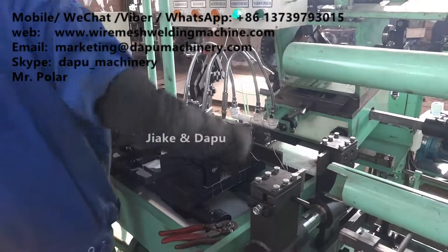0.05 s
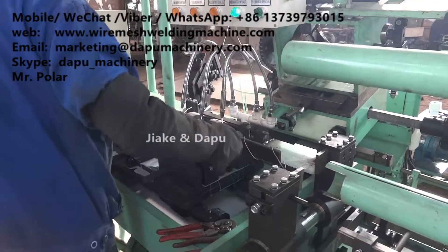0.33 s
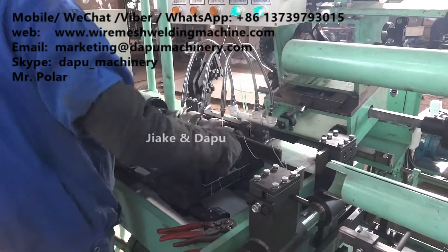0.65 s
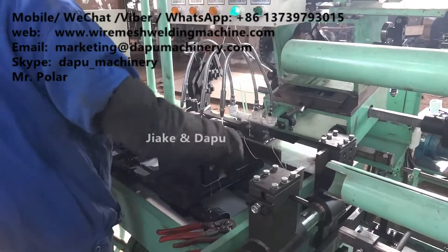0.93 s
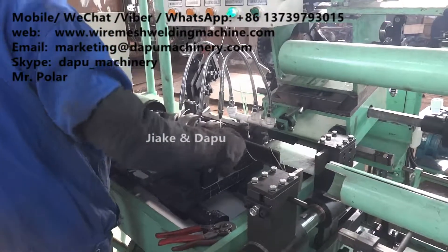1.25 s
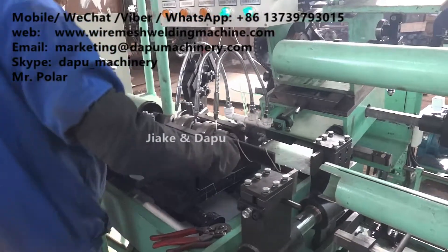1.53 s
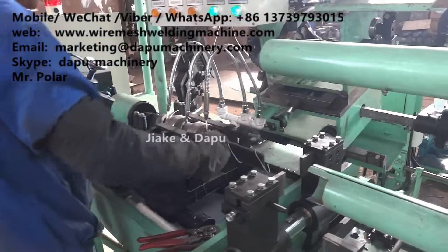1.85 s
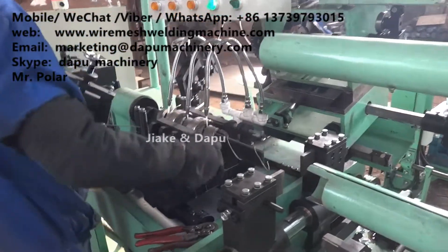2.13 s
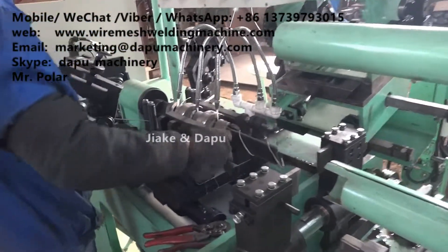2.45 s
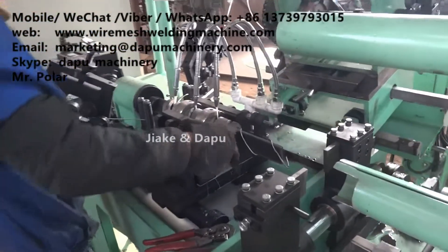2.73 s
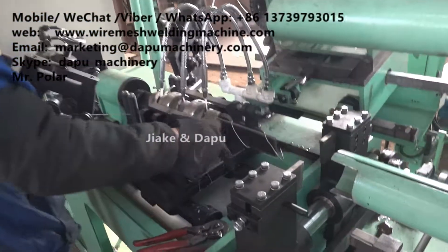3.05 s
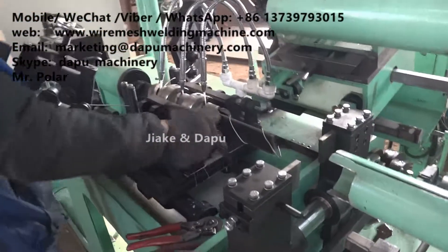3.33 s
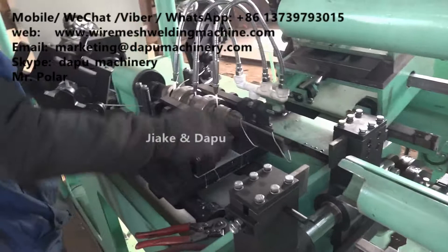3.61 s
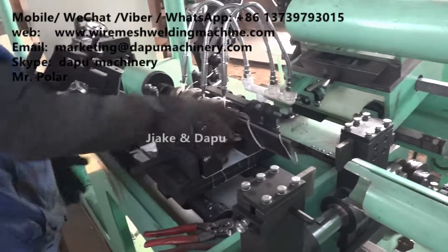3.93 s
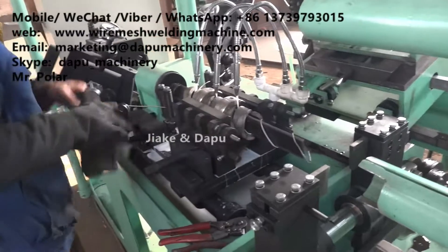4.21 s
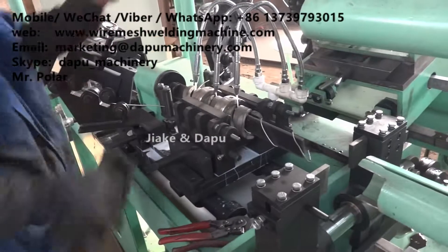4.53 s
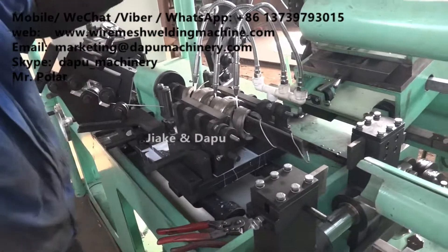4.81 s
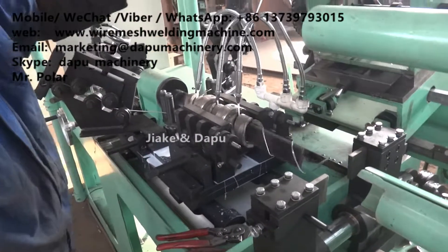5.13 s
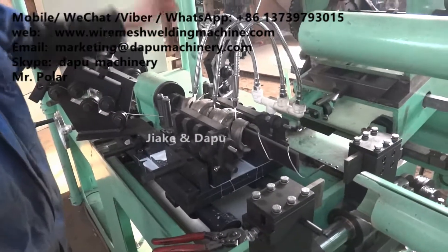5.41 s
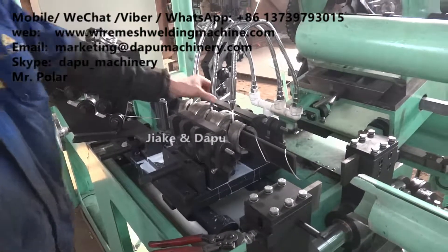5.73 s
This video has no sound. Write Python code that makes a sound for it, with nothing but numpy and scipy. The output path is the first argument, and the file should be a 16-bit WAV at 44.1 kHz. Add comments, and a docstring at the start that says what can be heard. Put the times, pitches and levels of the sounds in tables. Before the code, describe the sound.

A loud, harsh hiss of grinding on steel fills a factory hall, with a fast flutter and shifting ringing squeals. After about four seconds it dies away, and the roar and hum of other machines swell up. Close to the microphone, steel parts click and knock in a quick cluster. Another machine then starts to whine, and a thin distant squeak grows at the end.

```python
"""Grinding steel in a factory hall

An abrasive wheel grinds through steel at about 48 turns a second, then lifts off: its grit hisses,
the steel rings and squeals. Gain control lets the roar and hum of other machines swell up behind it.
Close by, a few steel parts click as a worker handles the wire feed of a fence machine."""
import sys
import numpy as np
from scipy import signal
from scipy.fft import rfft, irfft
from scipy.io import wavfile
from scipy.ndimage import uniform_filter1d, map_coordinates

SR = 44100
rng = np.random.default_rng(int(sys.argv[2]) if len(sys.argv) > 2 else 0)


def transcribe(u):
    """Save the signal u as a 16-bit wav file named by the first command-line argument.

    u: samples, shape (n,) or (channels, n), limited to [-1, 1]; the rate is SR.
    q: integer samples, one column per channel.
    """
    v = np.clip(np.atleast_2d(u).T, -1, 1)
    q = np.round(v * 32767).astype(np.int16)
    wavfile.write(sys.argv[1], SR, q)


N = 254456
TIME = np.arange(N) / SR
FREQ = np.fft.rfftfreq(N, 1 / SR)


def amp(db):
    """Decibels to gain."""
    return 10 ** (np.asarray(db) / 20)


def unit_rms(x):
    """Scale to rms 1."""
    return x / np.sqrt(np.mean(abs(x) ** 2) + 1e-20)


def spectrum(points):
    """Interpolate a table over log frequency."""
    hz, value = np.transpose(points)
    return np.interp(np.log(FREQ + 1), np.log(hz + 1), value)


def filtered(x, gain):
    """Apply one gain per frequency."""
    return irfft(rfft(x) * gain, N)


def noise():
    """Independent white noise for mid and side."""
    return rng.standard_normal((2, N))


def drift(rate_hz, size=2048):
    """Slow random curve, rms 1."""
    lowpass = np.exp(-(FREQ[:size // 2 + 1] / rate_hz) ** 2)
    slow = irfft(rfft(rng.standard_normal(size)) * lowpass)
    return unit_rms(np.interp(TIME, np.linspace(0, TIME[-1], size), slow))


def soft_ramp(x):
    """Quarter sine from 0 to 1."""
    return np.sin(np.pi / 2 * np.clip(x, 0, 1))


def tone(hz, waver, rate_hz):
    """Steady or gliding sine with wavering level and phase, rms 1."""
    carrier = np.exp(2j * np.pi * (np.cumsum(hz * np.ones(N)) / SR + rng.random((2, 1))))
    wobble = 1 + waver * (drift(rate_hz) + 1j * drift(rate_hz))
    return unit_rms((carrier * wobble).real)


def resonate(x, hz, width_hz):
    """Steep resonance that follows the curve hz, rms 1."""
    carrier = np.exp(2j * np.pi * np.cumsum(hz) / SR)
    pole = np.exp(-np.pi * width_hz / SR)
    baseband = signal.lfilter([(1 - pole) ** 2], [1, -2 * pole, pole * pole], x / carrier)
    return unit_rms((carrier * baseband).real)


def comb(depth_db, bins):
    """Gain of many overlapping echoes: narrow peaks and gaps."""
    ripple = uniform_filter1d(rng.standard_normal(len(FREQ)), bins)
    return amp(depth_db * unit_rms(uniform_filter1d(ripple, bins)))


# Hall roar: (frequency [Hz], relative density [dB])
ROAR_SPECTRUM = [(25, -33), (50, -31.5), (80, -29), (150, -17), (260, -9), (360, -9.5), (460, -3.5),
                 (620, -3.5), (1000, -2), (1400, -10), (1800, -9), (2500, -5.5), (3300, -17), (4200, -16),
                 (7000, -20), (11200, -27.5)]
# Rushing bands: (centre [Hz], width [Hz], peak time [s], peak level [dB], rise [dB/s], fall [dB/s])
RUSH_BANDS = [(2290, 430, 4.21, -22.5, 19, 9), (780, 700, 4.05, -23, 54, 20),
              (1410, 380, 5.14, -29.5, 4, 6), (4000, 4300, 3.95, -18.5, 9, 34)]


def roar():
    """Hall roar with swelling bands, plus a broad hiss that swells and dies as the wheel lifts off."""
    echoes = comb(depth_db=2.5, bins=70)  # the hall's resonances
    sound = amp(-24.5) * unit_rms(filtered(noise(), amp(spectrum(ROAR_SPECTRUM)) * echoes))
    for hz, width_hz, peak_s, peak_db, rise, fall in RUSH_BANDS:
        detune = (FREQ - hz ** 2 / (FREQ + 1)) / (2 * width_hz)
        band = 1 / (1 + detune ** 2) ** 2
        level_db = peak_db - np.maximum(rise * (peak_s - TIME), fall * (TIME - peak_s))
        sound += amp(level_db) * unit_rms(filtered(noise(), band * echoes))
    return sound * amp(0.68 * drift(rate_hz=24))


# Motor hum: (frequency [Hz], level [dB])
HUM_LINES = [(100, -65), (148, -58), (161, -57), (200, -54), (236, -46.5), (281, -46), (602, -47)]


def hum():
    """Running motors hold low, wavering tones."""
    return sum(amp(db) * tone(hz, waver=0.78, rate_hz=8) for hz, db in HUM_LINES)


# Machine whine: (frequency [Hz], level [dB])
WHINE_LINES = [(501, -41.5), (665, -40.5), (1093, -34), (1222, -36), (1265, -41), (1324, -32.5),
               (2390, -55), (2487, -57)]


def whine(start_s=4.9, rise_s=0.31):
    """Another machine starts to whine."""
    lines = sum(amp(db) * tone(hz, waver=0.96, rate_hz=15) for hz, db in WHINE_LINES)
    return lines * soft_ramp((TIME - start_s) / rise_s)


# Squeak envelope: (time [s], level [dB])
SQUEAK_LEVEL = [(4.9, -61), (5.08, -44), (5.58, -45), (5.63, -41.5), (5.77, -30)]


def squeak():
    """Metal squeaks thinly, far off."""
    return amp(np.interp(TIME, *np.transpose(SQUEAK_LEVEL))) * tone(hz=3500, waver=0.55, rate_hz=16)


def hall(x, t60_s, wet_db):
    """Add a diffuse tail, different for mid and side."""
    tail = noise() * amp(-60 * TIME / t60_s)
    tail /= np.linalg.norm(tail[0])
    return x + amp(wet_db) * signal.fftconvolve(x[:1], tail[:, :SR], axes=1)[:, :N]


def chatter(t, depth=0.97):
    """Loose contact roughens a ringing mode."""
    rattle = unit_rms(uniform_filter1d(rng.standard_normal(len(t)), 70))
    return (1 + depth * rattle) / np.hypot(1, depth)


# Modes of the hand-damped steel, by part: (frequency [Hz], level [dB], t60 [s])
PART_MODES = {"heavy": [(1240, -10, 0.056), (2850, -4.5, 0.088), (3080, -5, .045), (3580, -8.5, .07),
              (4107, -12, .08), (4930, -4, 0.065), (5230, -7, .039), (6650, -13, .04), (7230, -7, 0.051),
              (7420, -1.5, .02), (7817, -5, .055), (10100, -11, 0.049)], "light": [(2820, -13, 0.06),
              (3340, -3, .039), (4070, -10, 0.039), (4650, -3, .045), (5100, -12, .035), (5650, -7, .02),
              (6900, -6, .022), (8570, -10, .028), (9400, -6.5, .028)]}
# Knocks: (time [s], level [dB], contact [s], treble tilt [dB/octave], part)
KNOCKS = [(1.26, -15, .02, -4, "light"), (4.525, -20, .0014, 4, "light"),
          (4.815, -10.5, 0.034, 9.5, "heavy"), (4.844, -13.5, .008, 1, "heavy"),
          (4.857, -8, .002, -1, "heavy"), (4.863, -18, .003, -8.5, "heavy"),
          (4.913, -12.5, .003, 4.5, "light"), (4.927, -9.5, .0015, -4, "light"),
          (4.978, -29, .005, 7, "light")]


def clicks(crack_db=-7, crack_t60_s=0.03):
    """Steel parts knock close by: each contact cracks briefly and rings the part."""
    out, t = np.zeros((2, N)), TIME[:SR // 3]
    octaves = np.log2(np.clip(FREQ, 2000, 11000) / 5000)
    highpass = signal.butter(2, 1500, "high", fs=SR, output="sos")
    for time_s, db, contact_s, tilt_db, part in KNOCKS:
        ring = np.zeros((2, len(t)))
        for hz, mode_db, t60_s in PART_MODES[part]:
            envelope = amp(mode_db - 60 * t / t60_s) * chatter(t)
            ring += envelope * np.sin(2 * np.pi * (hz * t + rng.random((2, 1))))
        crack = signal.sosfilt(highpass, rng.standard_normal(ring.shape))
        crack *= amp(crack_db - 60 * t / crack_t60_s)
        attack = 1 - np.exp(-3 * t / contact_s)
        hit, start = np.zeros((2, N)), int(time_s * SR)
        hit[:, start:start + len(t)] = amp(db) * attack * (ring / np.sqrt(2) + crack)
        out += filtered(hit, amp(tilt_db * octaves))
    return hall(out, t60_s=0.37, wet_db=-7)


CUT_END_S = 4.0


def load(build_s=1.3, ease_s=0.6):
    """Pressure on the wheel, 0-1: builds, holds, eases off."""
    return soft_ramp(np.minimum(TIME / build_s, (CUT_END_S - TIME) / ease_s))


def rim(free_hz=49.2, sag_hz=1.05, kept_per_turn=0.907, points=1024):
    """Grit comes round each turn, a little more worn; the wheel slows under load."""
    turns_hz = free_hz - sag_hz * load()
    position = points * np.cumsum(turns_hz) / SR
    fresh = rng.standard_normal((2, N // points * 2, points))
    worn = signal.lfilter([1], [1, -kept_per_turn], fresh, axis=1)
    tracks = worn[:, 20:].reshape(2, -1)  # skip 20 turns of settling
    grit = [map_coordinates(track, [position], order=3, mode="nearest") for track in tracks]
    return unit_rms(np.array(grit))


def patchy(x, depth_db):
    """Narrow patches of spectrum swell and fade over tenths of a second."""
    frames = signal.stft(x, nperseg=1024)[2]
    patches = rng.standard_normal(frames.shape[1:])
    for _ in range(2):
        patches = uniform_filter1d(patches, 24, axis=1)  # time
        patches = uniform_filter1d(patches, 3, axis=0)  # frequency
    return signal.istft(frames * amp(depth_db * unit_rms(patches)), nperseg=1024)[1][:, :N]


# Grinding hiss: (frequency [Hz], relative density [dB])
HISS_SPECTRUM = [(150, -50), (340, -23), (450, -11.5), (900, -10.5), (1600, -8.5), (1900, -13),
                 (2080, -3.5), (2350, -6), (2900, -8.5), (3400, -6), (4200, -10), (5100, -2.5),
                 (6600, -5.5), (7600, -2), (9000, -6.5), (9650, -8), (10300, -6.5), (11200, -14.5)]


def hiss(drive, echoes):
    """Broad, patchy noise of grit on steel, rms 1."""
    steady = filtered(drive, amp(spectrum(HISS_SPECTRUM)) * echoes)
    return unit_rms(patchy(steady, depth_db=1.8))


# Cut steel: (first [Hz], last [Hz], width [Hz], full-load level re hiss [dB], no-load loss [dB])
CUT_MODES = [(2324, 2300, 190, -19, 0), (3630, 3340, 180, -26.5, 20), (5105, 5130, 110, -23.5, 27),
             (6150, 5400, 460, -18, 2), (7700, 7600, 3400, -29, 7), (9070, 8850, 580, -17.5, 16)]


def rings(drive, wander=0.0061):
    """The steel's resonances wander; most grow with load and sink as the cut deepens."""
    out = np.zeros((2, N))
    slack, depth = 1 - load(), np.minimum(TIME / CUT_END_S, 1)
    for first_hz, last_hz, width_hz, db, loss_db in CUT_MODES:
        hz = (first_hz + (last_hz - first_hz) * depth) * (1 + wander * drift(rate_hz=2.1))
        out += amp(db - loss_db * slack) * resonate(drive, hz, width_hz)
    return out


# Squeals: (start [s], length [s], rise [s], pitch [Hz], glide [Hz/s], level re hiss [dB], purity [0-1])
SQUEAL_EVENTS = [(-.1, 0.34, .1, 4980, -100, -8.5, 0.34), (-.1, 0.48, .14, 5530, 4, -11, 0.2),
                 (-.1, .8, .1, 8340, -100, -15, 0.2), (0.115, 0.39, .08, 10450, -100, -13, 0.5),
                 (.1, 0.13, .03, 913, 0, -17, 1), (0.285, 0.77, 0.082, 940, -13.5, -14.5, 0.81),
                 (.35, 0.25, .05, 4940, 1, -14, 0.9), (.42, 0.38, .1, 4588, -36, -14, .8),
                 (.45, 1.2, .2, 7460, 132.5, -11.5, .5), (0.618, 0.33, 0.078, 2623, -15.5, -10, 0.8),
                 (.85, 0.36, 0.076, 2537, -70.5, -13.5, 0.8), (.74, 0.29, .05, 5600, -350, -18, 0.95),
                 (.95, 0.3, .03, 5450, -150, -11.5, .92), (1.2, .25, .04, 5440, -100, -12, .6),
                 (0.977, 0.67, 0.058, 894, -14.5, -16.5, 0.92), (1.35, 0.26, .07, 434, 0, -18, .9),
                 (1.866, 0.34, 0.042, 435.4, -0.5, -17.5, 0.85), (2.35, .28, 0.066, 432, 0, -20, 0.95),
                 (1.25, 1.8, 0.83, 579, 1.5, -21, 1), (1.28, 0.38, .08, 7915, -1, -18, .75),
                 (1.42, 1.4, .1, 6170, 6, -13.5, 0.97), (1.483, 0.41, 0.091, 5115, -130, -14.5, 0.8),
                 (1.499, 0.91, .15, 825, -3.5, -19, 0.92), (1.723, 0.38, 0.084, 3590, -150, -15, 0.9),
                 (1.85, 0.35, .08, 7750, 0, -13, .1), (1.95, 0.44, .15, 5965, -2, -15.5, .85),
                 (2.175, 0.24, .06, 5140, -0.5, -12, 0.8), (2.327, .65, .08, 6000, 3, -13, 0.9),
                 (2.42, 1.1, 0.33, 3440, -4.5, -16, 0.92), (2.673, 0.52, 0.049, 1017, -8.5, -14.5, 0.7),
                 (2.65, 0.79, 0.093, 2690, 1, -18, 0.66), (3.082, 0.43, 0.18, 1019, -4, -10, 0.78),
                 (2.95, 1.47, 0.19, 983.4, -41.5, -15, 0.68), (3.05, 0.87, 0.44, 7930, 41.5, -10, 0.3),
                 (3.293, .29, .01, 2127, -2.5, -11, 0.9), (3.295, .17, .01, 3360, -150, -15, 0.7),
                 (3.448, 0.38, .08, 3250, -79, -13.5, 0.6), (3.274, 0.52, .04, 4830, -280, -14, .6),
                 (3.453, 0.33, .25, 10230, -1, -10, .2), (3.76, 0.8, .1, 5280, 0, -10.5, 0),
                 (3.76, 0.51, .06, 4730, -150, -12.5, 0.14)]


def squeals(drive, max_width_hz=400, growth_db=0.5):
    """The wheel catches: resonances flare, glide and fade around a whistling core."""
    out = np.zeros((2, N))
    for start_s, length_s, rise_s, first_hz, glide, db, purity in SQUEAL_EVENTS:
        roughness = np.clip(1 - purity, 0.02, 1)
        age = TIME - start_s
        on = (age > 0) & (age < length_s)
        hz = first_hz + glide * age
        ring = resonate(drive[:, on], hz[on], max_width_hz * roughness ** 1.5)
        core = tone(hz, waver=0.24, rate_hz=18)[:, on]
        voice = np.sqrt(roughness) * ring + np.sqrt(1 - roughness) * core
        progress = age[on] / length_s
        flare = np.minimum(age[on] / rise_s, 1) * np.sqrt(1 - progress ** 2)
        out[:, on] += amp(db + growth_db * progress) * flare * voice
    return out


# Hiss that repeats each turn: (frequency [Hz], power share [0-1])
REPEAT_SHARE = [(400, 0.97), (1500, 0.73), (2300, 0.65), (3500, 0.72), (6000, 0.73), (8000, 0),
                (11000, 0.5)]


def grinder(lift_s=4.108, flutter_db=0.53, treble_hz=6500, body_db_per_s=44, treble_db_per_s=76):
    """Repeating grit and fresh sparks hiss and ring the steel; on lift-off the treble dies first."""
    share = spectrum(REPEAT_SHARE)
    drive = filtered(rim(), np.sqrt(share)) + filtered(noise(), np.sqrt(1 - share))
    echoes = comb(depth_db=1.5, bins=330)  # reflections off nearby steel
    sound = hiss(drive, echoes)
    sound += rings(filtered(0.5 * drive + noise(), echoes))
    sound += squeals(noise())
    sound *= amp(-14.5 + flutter_db * drift(rate_hz=12.3))
    body = filtered(sound, 1 / (1 + (FREQ / treble_hz) ** 4))
    treble = sound - body
    lifted_s = np.maximum(TIME - lift_s, 0)
    return body * amp(-body_db_per_s * lifted_s) + treble * amp(-treble_db_per_s * lifted_s)


# Slow swell of the background: (time [s], gain [dB])
BACKGROUND_GAIN = [(0, -5.5), (1.2, -1), (3.6, -4), (4.3, 1), (5.7, -0.6)]
# Stereo width: (frequency [Hz], side re mid [dB])
SIDE_GAIN = [(60, -15), (130, -25), (270, -24.5), (570, -18), (1100, -13), (2200, -12), (4500, -10.5),
             (11000, -10.5)]


def scene():
    """Mix as mid and side, then convert to left and right."""
    grinding = grinder()
    background = roar() + hum() + whine() + squeak()
    background *= amp(np.interp(TIME, *np.transpose(BACKGROUND_GAIN)))
    mid, side = background + clicks() + grinding
    side = filtered(side, amp(spectrum(SIDE_GAIN)))
    return np.array([mid + side, mid - side]) * amp([[-0.28], [0.28]])


def record(dry, threshold_db=-22, reduction_db_per_db=0.52, cutoff_hz=11170):
    """Gain control holds the mix down while the wheel is loud; a steep low-pass follows."""
    power = uniform_filter1d((dry ** 2).mean(0), 6000)
    over_db = np.maximum(10 * np.log10(abs(power) + 1e-12) - threshold_db, 0)
    held = dry * amp(-reduction_db_per_db * over_db)
    lowpass = signal.firwin(801, cutoff_hz, window=("kaiser", 9), fs=SR)
    return signal.oaconvolve(held, lowpass[None], "same")


dry = scene()
out = record(dry)
transcribe(out)
```